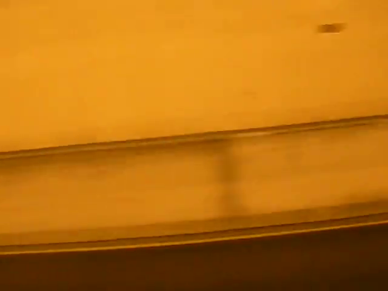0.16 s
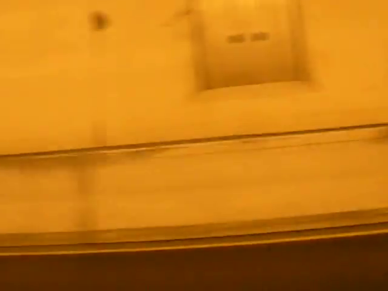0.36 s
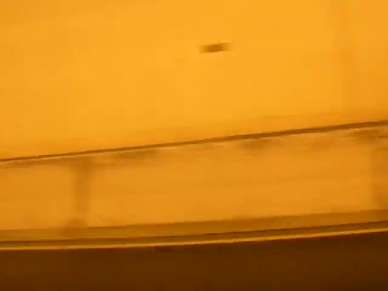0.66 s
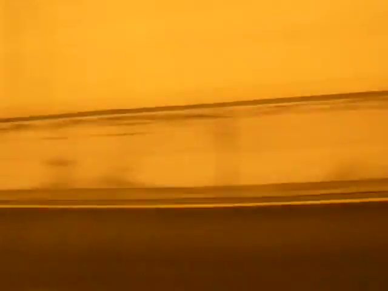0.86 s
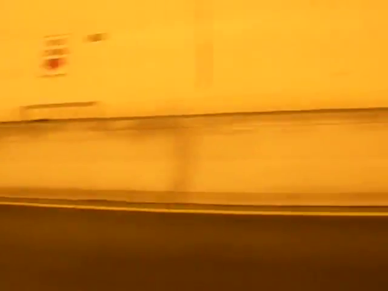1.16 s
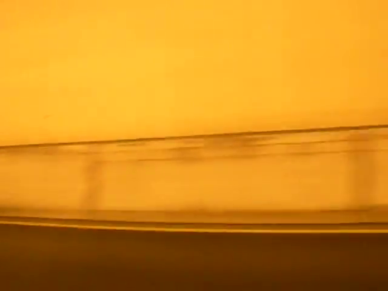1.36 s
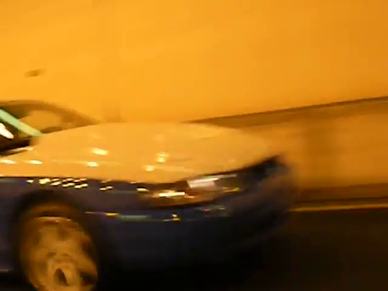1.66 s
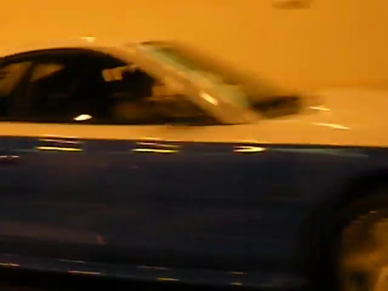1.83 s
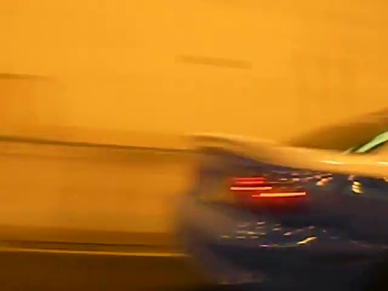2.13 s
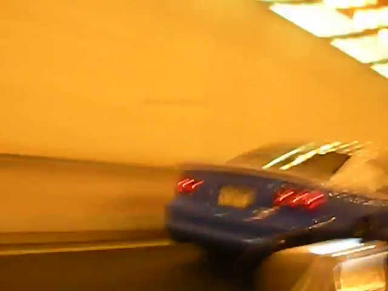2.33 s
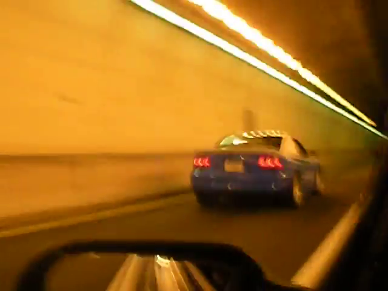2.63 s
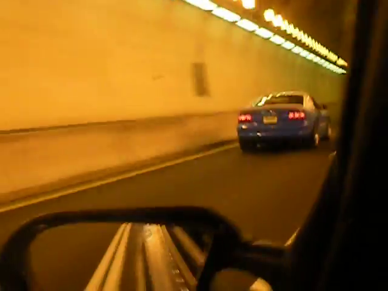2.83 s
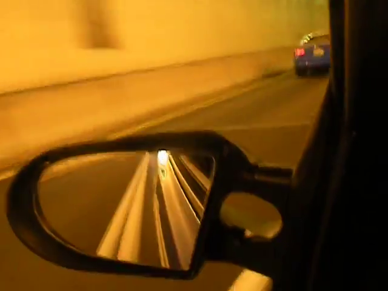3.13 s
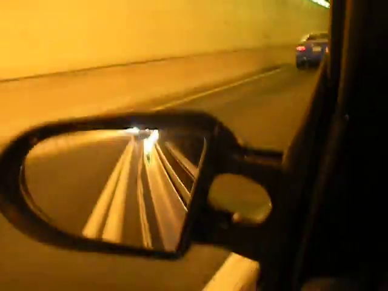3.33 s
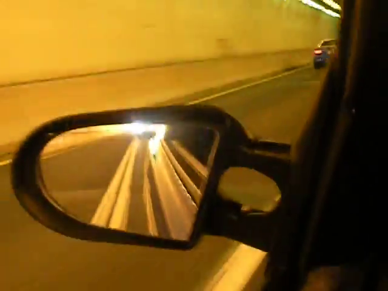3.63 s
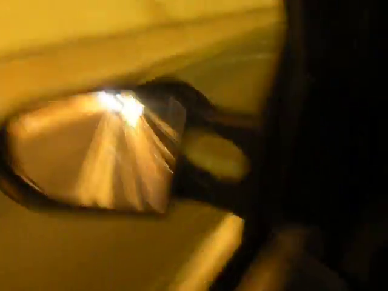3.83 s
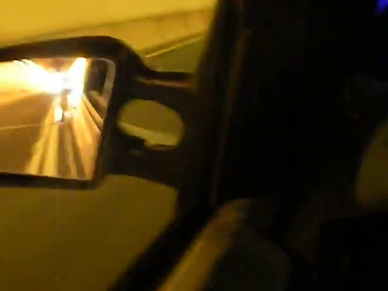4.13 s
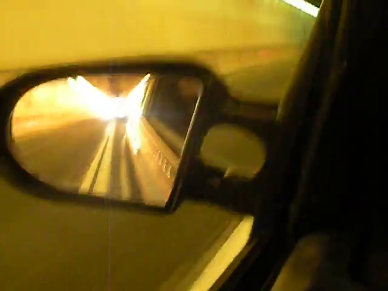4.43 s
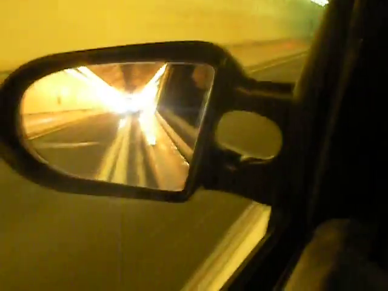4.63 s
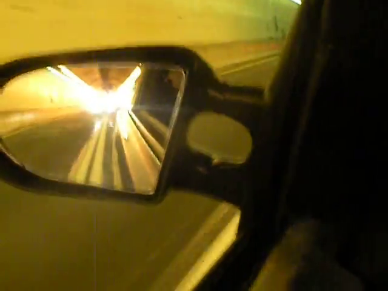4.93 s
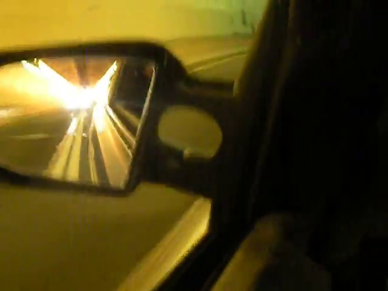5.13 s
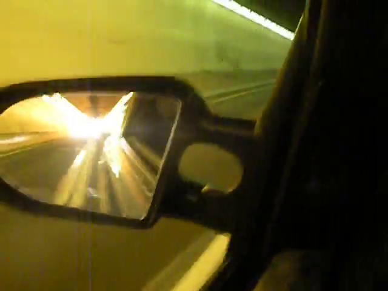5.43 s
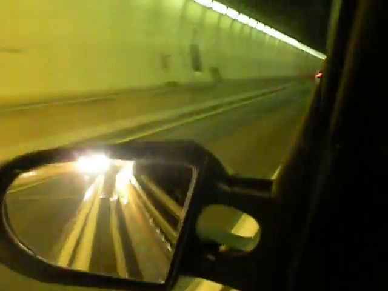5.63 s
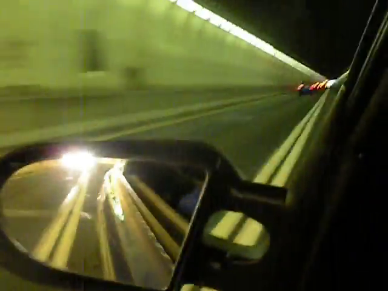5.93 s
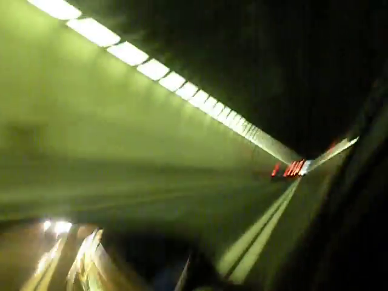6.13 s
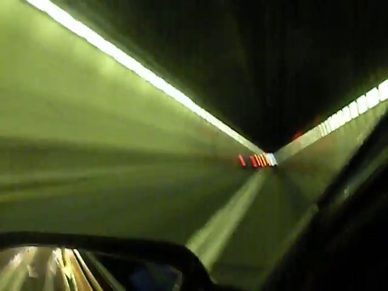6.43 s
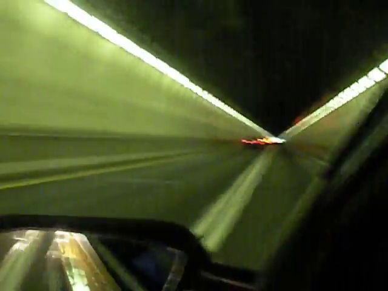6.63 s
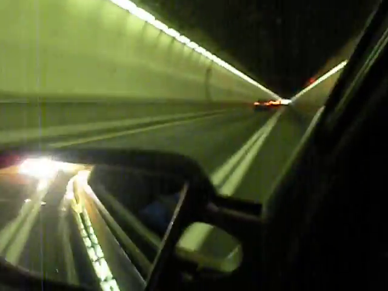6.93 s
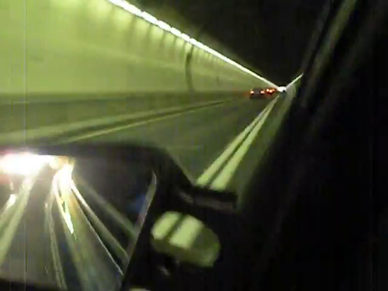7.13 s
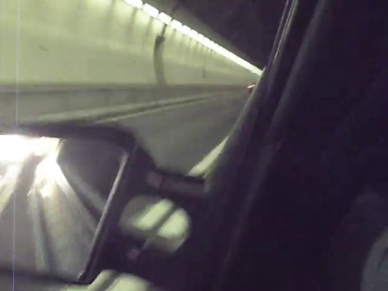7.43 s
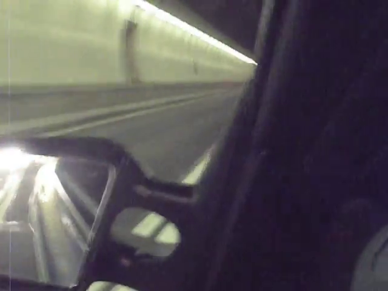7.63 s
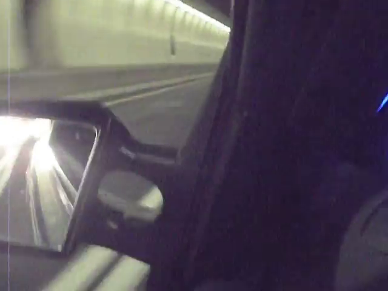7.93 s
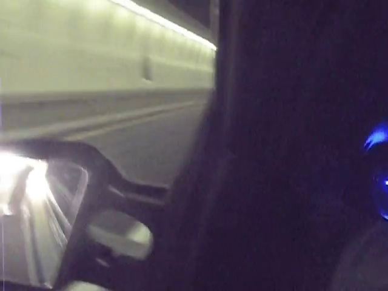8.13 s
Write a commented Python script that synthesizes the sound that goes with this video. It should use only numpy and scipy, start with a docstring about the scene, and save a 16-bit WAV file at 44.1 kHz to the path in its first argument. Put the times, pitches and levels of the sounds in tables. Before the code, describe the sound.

Several V8 engines pull hard in a reverberant road tunnel, heard from a moving car. An overtaker swells from behind, tears past with cracking exhaust and hissing tyres, and recedes. The roar turns duller, the nearby engine climbs, and rumble builds. Then rapid ragged wind thumps and sharp snaps cover everything before easing into scattered ticks, engine drone and faint whistle. The sound is narrow, gritty and overloaded.

```python
"""A concrete road tunnel: V8 cars accelerate, heard at the open window of one of them, the microphone's car.
One pulls from behind, a second overtakes close by, then the microphone's car opens up.
Engines are sums of exhaust lines; shaped noise makes the tunnel's roar, tyre hiss and rumble.
Near the end the slipstream buffets the microphone in short bursts and snaps, and a thin whistle joins.
A small recorder rounds and clips the peaks and keeps little above 4 kHz."""
import sys
import numpy as np
from scipy import signal
from scipy.fft import rfft, irfft, next_fast_len
from scipy.io import wavfile
from scipy.ndimage import uniform_filter1d

SR = 44100
rng = np.random.default_rng(int(sys.argv[2]) if len(sys.argv) > 2 else 0)


def materialize(psi):
    """Save the field psi as 16-bit PCM at rate SR to the path in sys.argv[1].

    A 1-D psi becomes a single channel; in a 2-D psi each row is a channel.
    """
    bounded = np.clip(np.atleast_2d(psi).T, -1, 1)
    quanta = np.round(bounded * 32767).astype(np.int16)
    wavfile.write(sys.argv[1], SR, quanta)


N = 364707
TIME = np.arange(N) / SR


def undb(db):
    """Decibels to amplitude gain."""
    return 10 ** (np.asarray(db) / 20)


def unit(x):
    """Scale to rms 1."""
    return x / np.sqrt(np.mean(x ** 2))


def curves(rows):
    """Each column of a table after the time, as a value per sample."""
    s, *columns = np.transpose(rows)
    return [np.interp(TIME, s, column) for column in columns]


def colour(x, points):
    """Filter by a (Hz, dB) spectrum, interpolated over log frequency, to rms 1."""
    hz, db = np.transpose(points)
    size = next_fast_len(N)
    f = np.fft.rfftfreq(size, 1 / SR)
    gain = undb(np.interp(np.log(f + 1), np.log(hz), db))
    return unit(irfft(rfft(x, size) * gain, size)[:N])


def band(x, low_hz, high_hz):
    """One steep band at rms 1."""
    sos = signal.butter(4, [low_hz, high_hz], "band", fs=SR, output="sos")
    return unit(signal.sosfiltfilt(sos, x))


def walk(rate_hz):
    """Smooth chance of rms 1: random values, rate_hz of them a second, joined by lines."""
    knots = np.arange(0, N / SR + 1, 1 / rate_hz)
    return unit(np.interp(TIME, knots, rng.standard_normal(len(knots))))


def noise():
    """White noise."""
    return rng.standard_normal(N)


def ramp(middle_s, length_s):
    """An even change from 0 to 1."""
    return np.clip(.5 + (TIME - middle_s) / length_s, 0, 1)


def swell(at_s, width_s):
    """A smooth rise to 1 and fall."""
    return np.exp(-((TIME - at_s) / width_s) ** 2)


def running(start_s, end_s, fade_s=0.098):
    """1 from start to end, with a fade before and after."""
    return np.clip(1 + np.minimum(TIME - start_s, end_s - TIME) / fade_s, 0, 1)


TUNNEL_T60_S = 2.6


def tunnel(x, wet_db):
    """Direct sound plus the dense echo of the concrete tube: decaying noise, cut after two seconds."""
    t = TIME[:2 * SR]
    tail = rng.standard_normal(len(t)) * np.exp(-np.log(1000) * t / TUNNEL_T60_S)
    echo = signal.fftconvolve(x, tail / np.linalg.norm(tail))[:N]
    return (x + undb(wet_db) * echo) / np.hypot(1, undb(wet_db))


# the overtaking car revs up, drops in pitch as it goes by, and pulls on:
# (time [s], firing rate [Hz])
OVERTAKER_PITCH = [(0.8, 279), (1.4, 289.8), (1.85, 298.2), (2.049, 313.2), (2.8, 306.1), (3.3, 315.6),
                   (4.5, 322.6)]
PASS_S = 2.324
OVERTAKER_DB, ALONGSIDE_DB = -28.5, 10.5  # its exhaust note from afar, and what it gains alongside


def closeness(coming_s, going_s, lead_s=0):
    """1 with the overtaker alongside, half at the given times before and after."""
    t = TIME - PASS_S + lead_s
    return 1 / (1 + (t / np.where(t < 0, coming_s, going_s)) ** 2)


def overtaker():
    """Firing rate and gain of the overtaking car, loudest just before it is level with the window."""
    firing_hz, = curves(OVERTAKER_PITCH)
    db = OVERTAKER_DB + ALONGSIDE_DB * closeness(coming_s=0.26, going_s=0.47, lead_s=0.051)
    return firing_hz, undb(db) * running(OVERTAKER_PITCH[0][0], OVERTAKER_PITCH[-1][0])


# exhaust lines, with relative levels for four engine sounds:
# (multiple of the eight-firing cycle [1], overtaker level [dB], follower level [dB],
#  level of a V8 at middle revs [dB], level of the microphone's car in its next gear [dB])
EXHAUST_LINES = [(5, -28, -28, -29, -24), (6, -30, -13, -25, -30), (8, -1, -1, 0, -11),
                 (10, -12, -5, -1, -20), (11, -11, -6, -8, -25), (12, -20, -9, -10, -21),
                 (13, -18, -8, -9, -25), (14, -16, -3, -4, -12), (15, -12, -11, -11, -19),
                 (16, -6, -6, 1, 0), (19, -14, -4, -9, -20), (21, -13, -13, -10, -21),
                 (22, -13, -12, -10, -18), (24, -8, -8, -4, -17), (26, -7, -6, -8, -20),
                 (27, -14, -12, -12, -21), (32, -18, -7, -7, -16), (40, -22, -17, -11, -11)]
# cabin resonances strengthen or weaken every exhaust line that climbs through them:
# (frequency [Hz], gain [dB])
CABIN_RESONANCES = [(165, -0.5), (178, -1), (185, 2.5), (190, 5), (193, -4), (214, -10), (228, 1.5),
                    (246, 3), (262, 0)]


def engine(firing_hz, gain, index, wet_db, rough, overtones=1):
    """Uneven firing puts lines on multiples of the two-turn cycle; shifting paths swell and blur them."""
    cycle = np.cumsum(firing_hz / 8 * (1 + .003 * walk(25) + .003 * walk(5))) / SR
    shudder = walk(130)
    heard = gain > 0
    out = np.zeros(N)
    for multiple, *line_db in EXHAUST_LINES:
        waver = (1 + rough * walk(40)) * undb(2.5 * walk(11))
        if multiple > 12:
            waver = waver * overtones
        # only lines above the firing rate are blurred
        blur = 3.3 * rough * np.clip(multiple / 8 - 1, 0, 1.3) * walk(28)[heard]
        boom_db = np.interp(multiple * firing_hz[heard] / 8, *np.transpose(CABIN_RESONANCES))
        phase = 2 * np.pi * (multiple * cycle[heard] + rng.random()) + blur
        out[heard] += undb(line_db[index] + boom_db) * waver[heard] * np.sin(phase)
    # all lines shudder together, as firings differ in strength
    out = out * (1 + .75 * rough * shudder)
    return tunnel(np.sqrt(2) * out * gain, wet_db)


# the other engines each hold one steady pull, loudest at one moment; in order: a car at high revs
# further back, the car behind, the microphone's car opening up, a car further off lifting the
# throttle, and the microphone's car in its next gear:
# (start [s], end [s], firing rate [Hz], climb [Hz/s], start offset [Hz], settling [s], loudest time [s],
#  level [dB], fade either side [dB/s], exhaust level column [index, rounded], echo [dB], roughness [0-1])
ENGINE_PULLS = [ (0.0, 0.83, 320.5, 12.5, 0, .3, 0.63, -32, 1, 0.5, -12.5, 0.35),
                (0.3, 4.0, 249.9, 13, 0, 0.27, 0.97, -30.5, 2, 1, -14, 0.16),
                (2.851, 6.0, 162.7, 11.5, -50, 0.32, 5.45, -30, 6.5, 2, -10.5, 0.22),
                (3.7, 5.4, 135.1, 0, 27, 0.37, 4.8, -41, 2.5, 2, -5.5, .35),
                (7.6, 8.27, 145.2, 4.5, 0, .3, 7.9, -26.5, 2, 3, -20, .06), ]


def pack():
    """Each engine settles from a change of throttle into a steady pull, swelling and fading as it goes."""
    out = 0
    for start, end, hz, climb, offset, settling, loudest, db, fade, column, wet_db, rough in ENGINE_PULLS:
        t = TIME - start
        firing_hz = hz + climb * t + offset * np.exp(-(t / settling) ** 2)
        gain = undb(db - fade * np.abs(TIME - loudest)) * running(start, end)
        out = out + engine(firing_hz, gain, index=round(column), wet_db=wet_db, rough=rough)
    return out


# the overtaker's open pipes, heard close to the microphone:
# (resonance [Hz], width [Hz], level [dB])
PIPE_RESONANCES = [(987, 98, 0), (1330, 250, -4.5), (1950, 190, -2.5), (2285, 150, 1), (3274, 240, -4)]
PASS_WIDTH_S, PASS_DB = 0.35, -17.5


def blare(sharpness=4, gas=0.49):
    """Alongside, each firing cracks through the open pipes; the two banks fire in a lopsided order."""
    firing_hz, _ = overtaker()
    firings = np.cumsum(firing_hz * (1 + .008 * walk(45))) / SR
    # firings of the near bank are twice as strong
    near_bank = np.array([1, 0, 1, 0, 0, 1, 0, 1])[firings.astype(int) % 8]
    puffs = np.exp(-sharpness * (firings % 1)) * (1 + near_bank) * (1 + gas * noise())
    ring = 0
    for hz, width, db in PIPE_RESONANCES:
        ring = ring + undb(db) * band(puffs, hz - width / 2, hz + width / 2)
    near = closeness(PASS_WIDTH_S, PASS_WIDTH_S)
    near = near * running(OVERTAKER_PITCH[0][0], OVERTAKER_PITCH[-1][0])
    return tunnel(unit(ring) * near, wet_db=-0.5) * undb(PASS_DB)


TYRES_S, TYRES_WIDTH_S, TYRES_DB = 2.32, 0.28, -20  # the overtaker's tyres hiss as it draws level


def tyres(low_hz=1150, high_hz=3600, level_s=2.22, sweep_s=0.26, lag_s=0.00163, mirror=0.79):
    """Hiss arrives direct and mirrored; the lag peaks near the pass, so its colour sweeps down and up."""
    hiss = band(noise(), low_hz, high_hz)
    lag = lag_s / np.hypot(1, (TIME - level_s) / sweep_s)
    both = hiss + mirror * np.interp(TIME - lag, TIME, hiss)
    return unit(both) * undb(TYRES_DB) * swell(TYRES_S, TYRES_WIDTH_S)


# the brightest part of the overtaker's hiss dips as it draws level, and flares behind it:
# (time [s], centre [Hz], level [dB])
HISS_FLARE = [(1.9, 2585, -44), (2.06, 2405, -23), (2.13, 1950, -17), (2.21, 1777, -30), (2.3, 2150, -28),
              (2.39, 2195, -18), (2.471, 2383, -20), (2.61, 2236, -26), (2.75, 2241, -44)]
FLARE_WIDTH_HZ = 330


def flare():
    """Low-passed noise on a moving carrier: a narrow band of hiss that moves with the passing car."""
    hz, db = curves(HISS_FLARE)
    low_pass = signal.butter(2, FLARE_WIDTH_HZ / 2, fs=SR, output="sos")
    hiss = unit(signal.sosfilt(low_pass, noise()))
    carrier = np.sqrt(2) * np.sin(2 * np.pi * np.cumsum(hz) / SR)
    return hiss * carrier * undb(db) * running(HISS_FLARE[0][0], HISS_FLARE[-1][0])


# spectrum of the roar in the tube: (frequency [Hz], relative level per Hz [dB])
ROAR_SPECTRUM = [(90, -35), (170, -19.5), (228, -12), (285, 0.5), (360, -1.5), (480, -8), (610, -2),
                 (740, -2.5), (1020, -2), (1400, -5.5), (1800, -5.5), (2300, -7.5), (3600, -11.5),
                 (4400, -23.5)]
# the roar ebbs and surges: (time [s], half length [s], level change [dB])
ROAR_SURGES = [(0.38, 0.089, -0.5), (2.323, 0.064, 0.5), (2.654, 0.14, -1.1), (3.056, 0.21, 0.85),
               (3.551, 0.23, -2), (4.299, 0.63, 2), (5.471, 0.083, 4), (7.801, 0.12, -3.5)]
# it slowly fades as the pack draws ahead, and rises as the overtaker goes by
ROAR_DB, ROAR_FADE_DB_PER_S, ROAR_PASS_DB = -17, 0.31, 2.5
# rasp against body (dB): with the cars near, once they are far ahead, and the extra as one goes by
RASP_NEAR_DB, RASP_FAR_DB, RASP_PASS_DB = -5, -13, 7
AWAY_S, AWAY_LENGTH_S = 3.91, 1.12  # middle and length of the change from near to far


def roar(pulsing=0.11, flicker_db=1.34, neutral_db=-2.0, rasp_slope=1.23, boom_slope=0.56, wander_db=.5):
    """Exhaust gas and tyres echo down the tube, dull from afar; the overtaker's gas comes in puffs."""
    firing_hz, gain = overtaker()
    phase = 2 * np.pi * np.cumsum(firing_hz) / SR
    puffs = 1 + pulsing * gain / gain.max() * (np.cos(phase) + np.cos(phase * 3 / 8) / 2)
    gas = colour(noise() * puffs, ROAR_SPECTRUM)
    # the pipes point backwards, so the car is heard longer going than coming
    near = closeness(coming_s=0.29, going_s=0.75)
    level_db = ROAR_DB - ROAR_FADE_DB_PER_S * TIME + ROAR_PASS_DB * near + wander_db * walk(7)
    level_db = level_db + sum(db * swell(s, width) for s, width, db in ROAR_SURGES)
    away_db = (RASP_FAR_DB - RASP_NEAR_DB) * ramp(AWAY_S, AWAY_LENGTH_S)
    rasp_db = RASP_NEAR_DB + away_db + RASP_PASS_DB * near
    out, below = 0, 0
    # half-octave bands, each flickering by itself
    for edge_hz in 200 * 2 ** np.arange(0, 5.6, .5):
        upto = signal.sosfiltfilt(signal.butter(4, edge_hz, fs=SR, output="sos"), gas)
        # distance tips the spectrum: less rasp, more boom
        tilt = np.interp(np.log(edge_hz), np.log([330, 950, 3200]), [-boom_slope, 0, rasp_slope])
        out = out + (upto - below) * undb(tilt * (rasp_db - neutral_db) + flicker_db * walk(30))
        below = upto
    return out * undb(level_db)


# one sharp click after the pass, then the hard bursts of wind on the microphone:
# (time [s], length [s], level before trim [dB], treble against that level before trim [dB])
HARD_BURSTS = [(2.887, 0.0024, -13, 4), (5.665, 0.0065, -24, -19), (5.975, 0.0031, -14, -7),
               (6.019, .007, -15, -15), (6.03, 0.0063, -9.5, -17.5), (6.062, 0.029, -15, -14.5),
               (6.145, 0.01, -12, -20), (6.186, 0.012, -10, -16), (6.216, 0.012, -21.5, -12),
               (6.276, 0.046, -25, -6), (6.323, 0.018, -14.5, -18.5), (6.384, 0.03, -10.5, -21),
               (6.409, 0.027, -17.5, -14), (6.444, 0.015, -16, -17), (6.467, 0.043, -10, -13.5),
               (6.519, 0.023, -12, -13.5), (6.563, 0.015, -16.5, -18), (6.584, 0.015, -16.5, -14),
               (6.604, 0.013, -11.5, -15), (6.635, 0.0076, -14, -9.5), (6.645, 0.019, -16, -16),
               (6.679, 0.0076, -19.5, -12), (6.706, 0.016, -14, -18), (6.73, 0.033, -7.5, -13),
               (6.768, 0.059, -12, -13), (6.833, 0.035, -10, -16.5), (6.881, 0.028, -13, -14),
               (6.911, 0.031, -9.5, -15), (6.95, 0.011, -12.5, -18), (6.966, 0.0068, -13, -14),
               (6.984, 0.015, -12, -6.5), (7.007, 0.0205, -13.5, -15), (7.037, 0.014, -12.5, -19),
               (7.055, 0.03, -11, -13.5), (7.101, 0.024, -11.5, -15), (7.153, 0.024, -14, -20),
               (7.182, 0.012, -13.5, -19), (7.216, 0.025, -18.5, -19), (7.248, 0.012, -12, -13),
               (7.279, 0.021, -19.5, -17), (7.313, 0.004, -10.5, -21), (7.337, .006, -22, -14),
               (7.372, 0.0051, -21, -8.5), (7.397, 0.0042, -12, -26), (7.423, 0.009, -21, -9),
               (7.447, 0.017, -13.5, -12), (7.511, 0.0071, -13.5, -21), (7.524, .006, -21, -14),
               (7.579, 0.0069, -15.5, -24), (7.678, 0.033, -17.5, -13), (7.745, 0.0054, -14, -12),
               (7.767, 0.014, -16, -13.5), (7.785, .004, -10.5, -10.5), (7.824, 0.0055, -13, -10.5),
               (7.864, 0.0052, -17, -21), (7.883, 0.006, -13, -16), (7.963, 0.02, -19, -10.5),
               (8.055, 0.0075, -15, -11), (8.211, 0.022, -19, -9)]
# spectrum of the churning air: (frequency [Hz], relative level per Hz [dB])
EDDY_SPECTRUM = [(30, -44), (90, -20), (140, -8), (215, -2), (330, 1), (600, -3), (950, -8), (1580, -14),
                 (2150, -22), (3500, -27), (4400, -42)]
# lesser eddies come by chance, strongest at the height of the slipstream
EDDIES_FROM_S, EDDY_LENGTH_S, EDDY_DB, EDDY_SCATTER_DB, EDDY_TREBLE_DB = 5, .005, -24, 0.5, -11
HEIGHT_S, HEIGHT_WIDTH_S, HEIGHT_DB = 6.94, 0.34, 8
CRACK_DB = 4.5  # the pressure spike at the front of a burst, against its untrimmed treble


def eddies(count=60):
    """Small eddies at loosely even times, in the same columns as the hard bursts."""
    jitter, stretch, strength, bright = rng.standard_normal((count, 4)).T
    s = np.linspace(EDDIES_FROM_S, N / SR, count, endpoint=False) + EDDY_LENGTH_S * jitter
    length_s = EDDY_LENGTH_S * np.exp(0.33 * stretch)
    height = np.exp(-((s - HEIGHT_S) / HEIGHT_WIDTH_S) ** 2)
    db = EDDY_DB + HEIGHT_DB * height + EDDY_SCATTER_DB * strength
    return list(zip(s, length_s, db, EDDY_TREBLE_DB + EDDY_SCATTER_DB * bright))


def buffeting(rise_s=.0012, edge_s=0.002, gust_db=-1.34, treble_db=-3.5, slap_db=2.5, crack_s=0.00012):
    """Each burst cracks at the microphone port, then churns in spiky noise, brightest at the front."""
    air = colour(noise(), EDDY_SPECTRUM)
    thump, tear, cracks = np.zeros((3, N))
    for s, length, db, bright_db in HARD_BURSTS + eddies():
        at = slice(int((s - edge_s) * SR), int((s + length + 6 * edge_s) * SR))
        t = TIME[at] - s
        decay = np.exp(-np.maximum(t - length + edge_s, 0) / edge_s)
        shape = np.clip(1 + 2 * t / rise_s, 0, 1) * decay
        slap = undb(slap_db * np.exp(-((t - edge_s) / edge_s) ** 2))
        # where bursts overlap, the stronger one covers the other
        thump[at] = np.maximum(thump[at], shape * np.sqrt(slap) * undb(db + gust_db))
        tear[at] = np.maximum(tear[at], shape * slap * undb(db + bright_db + treble_db))
        spike = ((t - rise_s) / crack_s) ** 2
        cracks[at] -= (1 - 2 * spike) * np.exp(-spike) * undb(db + bright_db + CRACK_DB)
    churn = walk(450)
    low = band(air, 25, 900)
    # the body of a burst is evened out before the churn
    low = low / np.sqrt(uniform_filter1d(low ** 2, size=SR // 130)) * unit(undb(1.5 * churn))
    middle = band(air, 900, 1600) * unit(undb(3 * churn))
    high = band(air, 1600, 5000) * unit(undb(3.2 * churn))
    return (low + undb(-12.5) * middle) * thump + high * tear + cracks


# the sharpest snaps of air on the microphone port: (time [s], peak level before SNAP_DB [dB])
PORT_SNAPS = [(5.976, -6), (6.033, -9), (6.066, -12), (6.076, -7), (6.146, -9), (6.186, -11), (6.388, -7),
              (6.485, -1), (6.495, -8), (6.523, -1), (6.611, -7), (6.637, -6), (6.736, 0.5), (6.758, -3),
              (6.790, -7), (6.810, -4), (6.851, -2), (6.859, -1), (6.884, -7), (6.913, -8), (6.931, -8),
              (6.954, -4), (6.970, -7), (6.987, -1), (7.073, 2), (7.106, -5), (7.166, -6), (7.257, -5),
              (7.449, -4.5), (7.461, -2), (7.515, -12), (7.692, -8), (7.787, -3), (7.825, -8), (7.884, -9)]
SNAP_S, SNAP_DB = 0.00055, -2.5  # time until the pressure swings back, and gain of all snaps


def snaps():
    """The pressure drops at once, then swings back."""
    out = np.zeros(N)
    age = np.arange(SR // 100) / SR / SNAP_S
    for s, db in PORT_SNAPS:
        at = slice(int(s * SR), int(s * SR) + SR // 100)
        out[at] -= (1 - age) * np.exp(-age) * undb(db + SNAP_DB)
    return out


WHISTLE_HZ, WHISTLE_DB, WHISTLE_FROM_S = 2080, -42.5, 7.5


def whistle():
    """A thin whistle comes with the next gear: one sine, unsteady in pitch and level."""
    phase = 2 * np.pi * np.cumsum(WHISTLE_HZ * (1 + .003 * walk(60))) / SR
    level = undb(WHISTLE_DB + 2.5 * walk(15)) * running(WHISTLE_FROM_S, N / SR)
    return np.sqrt(2) * np.sin(phase) * level


# spectrum of the rumble at the window: (frequency [Hz], relative level per Hz [dB])
RUMBLE_SPECTRUM = [(20, -20.5), (50, -13.5), (90, -6), (140, 2.5), (190, 6.5), (300, -2), (600, -32)]
# rumble (dB): cruising, at full speed, and in the overtaker's wake
CRUISE_DB, FAST_DB, WAKE_DB = -46.5, -29.5, -34.5
SPEED_UP_S, SPEED_UP_LENGTH_S = 4.95, 1.9  # middle and length of the gain in speed


def rumble(wander_db=1.5):
    """Tyres shake the body; air tumbles at the window, more with speed and in the overtaker's wake."""
    road = undb(CRUISE_DB + (FAST_DB - CRUISE_DB) * ramp(SPEED_UP_S, SPEED_UP_LENGTH_S))
    wake = undb(WAKE_DB) * swell(PASS_S, width_s=0.39)
    return colour(noise(), RUMBLE_SPECTRUM) * np.hypot(road, wake) * undb(wander_db * walk(13))


# the overtaker's overtones stand out as it revs up from behind (fore),
# and again while its pipes point at the microphone (aft)
FORE_DB, FORE_S, FORE_WIDTH_S = 3, 1.6, 0.52
AFT_DB, AFT_S, AFT_WIDTH_S = 3, 3, 0.28
# all but the eddies and snaps sinks while the wind hits the microphone
SINK_FROM_S, SINK_TO_S, SINK_EDGE_S, SINK_DB = 6.01, 7.62, 0.045, -8.5


def scene():
    """The engines in the tunnel's roar, with wind on top."""
    bright = undb(FORE_DB * swell(FORE_S, FORE_WIDTH_S) + AFT_DB * swell(AFT_S, AFT_WIDTH_S))
    cars = engine(*overtaker(), index=0, wet_db=-14, rough=.29, overtones=bright) + pack()
    passing = blare() + tyres() + flare()
    background = roar() + rumble() + whistle()
    windy = ramp(SINK_FROM_S, SINK_EDGE_S) - ramp(SINK_TO_S, SINK_EDGE_S)
    wind = buffeting() + snaps()
    return ((cars + passing + background) * undb(SINK_DB * windy) + wind)[None]


KNEE, LOPSIDED = 0.72, 0.06  # where the amplifier saturates, and how much further it swings downwards
BAND_HZ, CLIP_LEVEL, TOP_HZ = 4950, .71, 15900  # 75 dB down from BAND_HZ; crackle passes up to TOP_HZ


def record(dry):
    """The recorder rounds peaks and keeps a narrow band; what overshoots is clipped with a faint crackle."""
    knee = KNEE - LOPSIDED * np.sign(dry)
    rounded = knee * dry / (knee ** 6 + dry ** 6) ** (1 / 6)
    high_pass = signal.butter(1, 45, "high", fs=SR, output="sos")
    thin = signal.sosfiltfilt(high_pass, rounded, padtype="even", padlen=SR // 10)
    narrow = signal.sosfilt(signal.cheby2(14, 75, BAND_HZ, fs=SR, output="sos"), thin)
    clipped = np.clip(narrow, -CLIP_LEVEL, CLIP_LEVEL)
    return signal.sosfilt(signal.ellip(8, .2, 70, TOP_HZ, fs=SR, output="sos"), clipped)


dry = scene()
out = record(dry)
materialize(out)
```